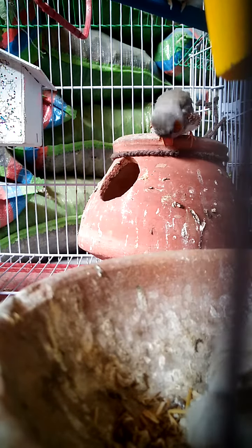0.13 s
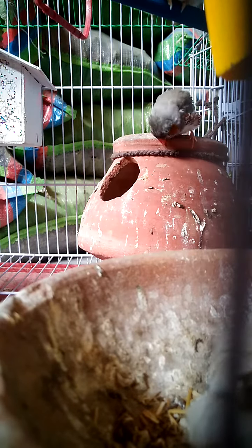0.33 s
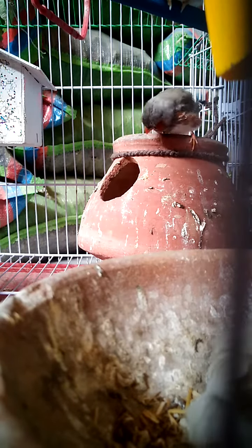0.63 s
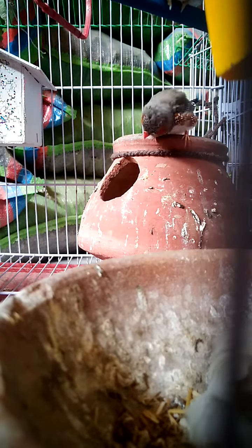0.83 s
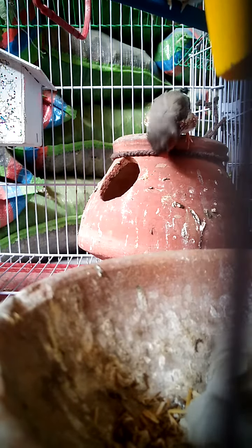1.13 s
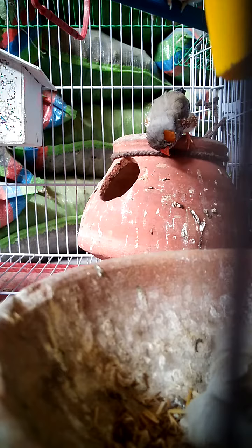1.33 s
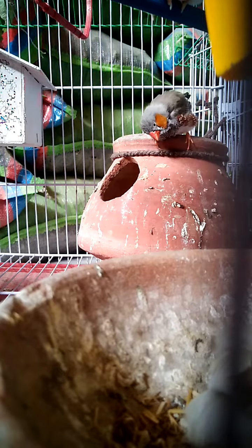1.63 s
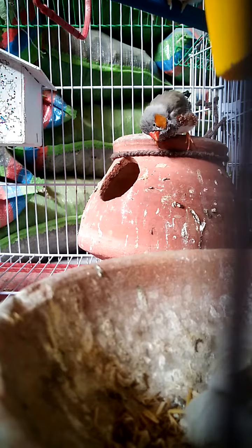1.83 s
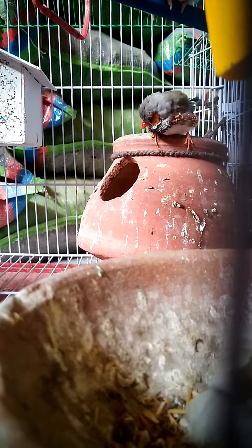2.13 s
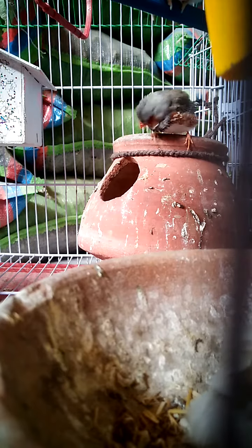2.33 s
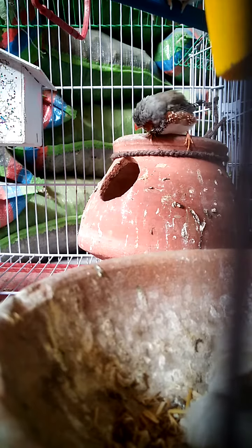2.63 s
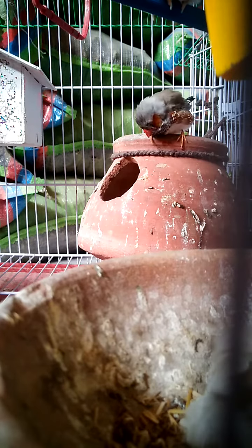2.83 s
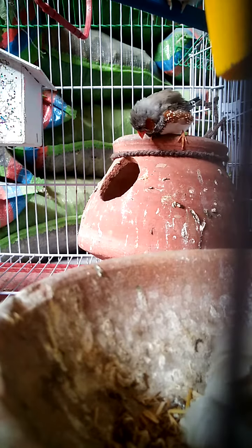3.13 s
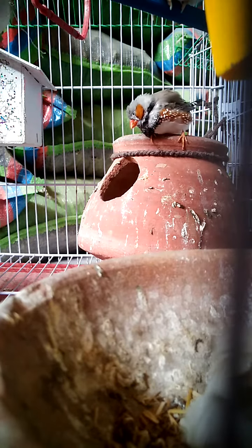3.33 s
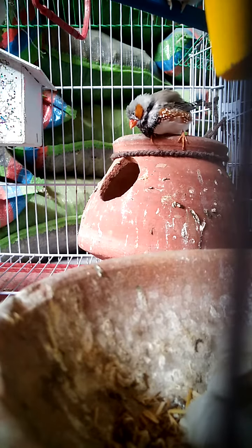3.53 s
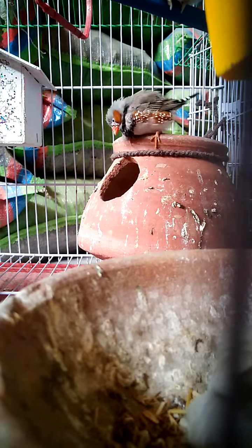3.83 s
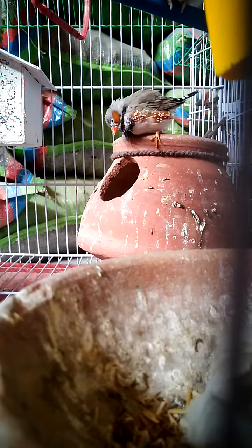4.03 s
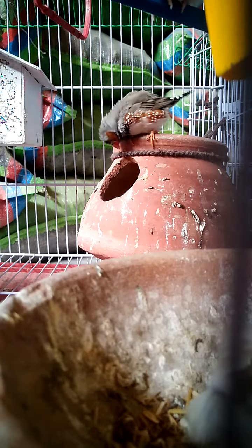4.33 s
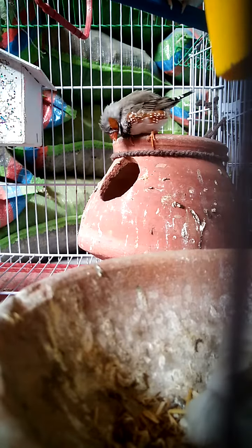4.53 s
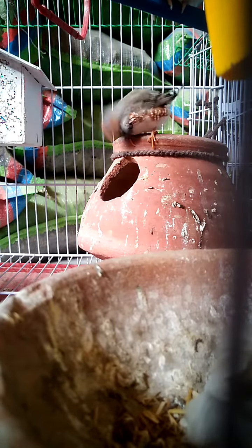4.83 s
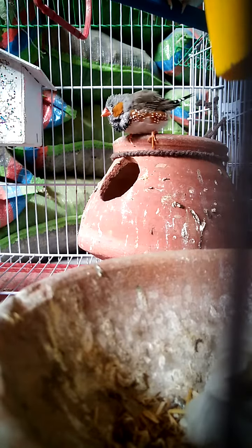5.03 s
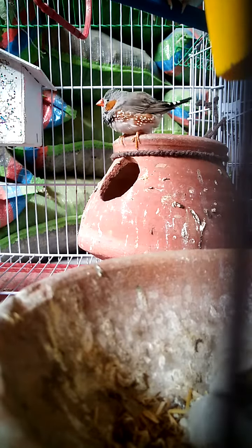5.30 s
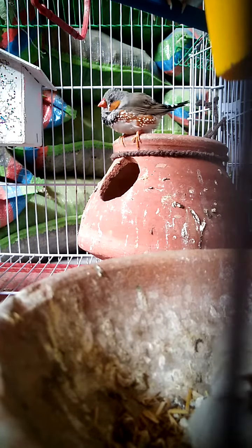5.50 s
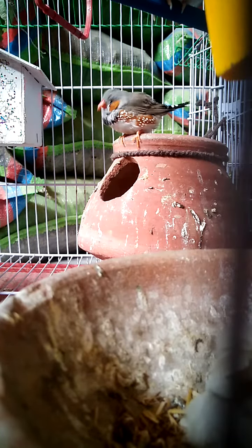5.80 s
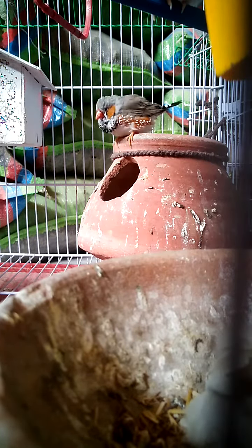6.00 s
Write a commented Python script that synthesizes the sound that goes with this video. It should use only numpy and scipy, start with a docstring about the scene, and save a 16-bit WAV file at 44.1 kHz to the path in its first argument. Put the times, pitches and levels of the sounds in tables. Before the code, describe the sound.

Very short, piercing bird calls with leaping pitch and rough edges stand far above a quiet room. First one, then after soft distant chirps a rapid cluster, then preening rustle and light pot taps, finally another single call and bright clicks. A hard indoor space rings after each call; the near microphone is pushed to its limit, with the bird close and slightly left.

```python
"""Loud, harsh calls of a zebra finch on a clay nest pot in a wire cage: one, a quick run, one more.
Each call is a high whistle-like tone with overtones that leaps in pitch and breaks into roughness.
Between calls: faint farther chirps and tones, hollow knocks from the pot's modes, ticks and feather rustle of
shaped noise. A hard-walled room of decaying noise rings after them; the calls drive the recorder's limiter."""
import sys
import numpy as np
from scipy import signal
from scipy.fft import rfft, irfft, next_fast_len
from scipy.io import wavfile
from scipy.ndimage import uniform_filter1d

SR = 44100
rng = np.random.default_rng(int(sys.argv[2]) if len(sys.argv) > 2 else 0)


def store_wav(level_fs):
    """Save 16-bit WAV to argv[1]."""
    pcm = np.round(np.clip(np.atleast_2d(level_fs), -1, 1) * 32767)
    wavfile.write(sys.argv[1], SR, pcm.T.astype(np.int16))


N = 271656
TIME = np.arange(N) / SR


def from_db(db):
    """Decibels to gain."""
    return 10 ** (np.asarray(db) / 20)


def rms_one(x):
    """Scale to an rms of 1."""
    return x / np.sqrt(np.mean(x ** 2) + 1e-20)


def at_hz(points, hz):
    """Read a table on a log-frequency axis."""
    known_hz, values = np.transpose(points)
    return np.interp(np.log(np.maximum(hz, 1)), np.log(known_hz), values)


def coloured(x, spectrum):
    """Filter a signal by a smooth spectrum of (Hz, dB) points."""
    size = next_fast_len(x.shape[-1] + 1024)
    hz = np.arange(size // 2 + 1) * SR / size
    shaped = rfft(x, size) * from_db(at_hz(spectrum, hz))
    return irfft(shaped, size)[..., :x.shape[-1]]


def coloured_noise(size, spectrum):
    """Noise of a given spectrum with an rms of 1."""
    return rms_one(coloured(rng.standard_normal(size), spectrum))


def decay(t, t60_s):
    """Exponential fall by 60 dB in t60_s."""
    return np.exp(-np.log(1000) * t / t60_s)


def flutter(rate_hz, size):
    """Random wobble up to about the given rate; spread 1."""
    low_pass = signal.butter(2, min(rate_hz, SR / 4), fs=SR, output="sos")
    return rms_one(signal.sosfilt(low_pass, rng.standard_normal(size + SR // 10))[-size:])


def add(track, s, sound):
    """Mix a sound into a track at a time."""
    start = int(s * SR)
    part = sound[..., :max(N - start, 0)]
    track[..., start:start + part.shape[-1]] += part


def syrinx(pitch_hz, level_db, rough, jitter, rasp_db, jitter_hz=600, shimmer=0.78, buzz_hz=480,
           buzz_depth=0.095, air_db=-40, leap_per_s=110, second_ratio=1.21, second_db=-3):
    """One note: a tone with overtones, shaped by the throat; roughness shakes its pitch and strength."""
    # Throat and beak resonances. Each row: frequency in Hz, gain in dB.
    throat = [(1200, -6.5), (2400, -20.5), (3100, -11), (4000, -4), (4950, -15), (6300, 10), (7300, -3.5),
              (8400, -10), (9700, -15), (10400, -15), (11200, -19.5), (12500, -20.5), (15000, -52)]
    size = len(pitch_hz)
    shake, tremble, wander = (flutter(jitter_hz, SR // 4)[:size] for _ in range(3))
    # the second side of the syrinx beats against the first as a fast, uneven buzz
    buzz = np.sin(2 * np.pi * np.cumsum(buzz_hz * (1 + .25 * wander)) / SR)
    shaken_hz = pitch_hz * (1 + rough * (jitter * shake + buzz_depth * buzz))
    phase = 2 * np.pi * np.cumsum(shaken_hz) / SR
    # low notes put the second harmonic on the throat's main resonance, high notes the first
    harmonic = np.arange(1, 9)[:, None]
    harmonic_hz = harmonic * pitch_hz
    weight = from_db(at_hz(throat, harmonic_hz)) * (harmonic_hz < SR / 2)
    tone = (weight * np.sin(harmonic * phase)).sum(0) / np.sqrt((weight ** 2).sum(0) / 2)
    # in rough notes the two sides part and a second, higher tone crosses the first
    second = np.sin(second_ratio * phase) + np.sin(2 * second_ratio * phase)
    tone = tone + from_db(second_db) * rough * second
    # the tone weakens in the steepest sweeps
    leap = np.abs(np.gradient(np.log(pitch_hz))) * SR
    tone = tone / (1 + (leap / leap_per_s) ** 4)
    air = coloured_noise(SR // 4, throat)[:size]
    air_gain = from_db(air_db) + from_db(rasp_db) * rough
    voice = tone * (1 + shimmer * rough * tremble) + air * air_gain
    return voice * from_db(level_db)


def notes(rows, jitter, rasp_db, attack_s, release_s=0.0035):
    """Each note's pitch follows a parabola through three values; its level changes evenly in dB."""
    out = np.zeros(N)
    for s, length_s, start_hz, middle_hz, end_hz, level_db, fade_db, rough in rows:
        t = TIME[:int(length_s * SR)]
        along = t / length_s
        pitch_hz = np.polyval(np.polyfit([0, .5, 1], [start_hz, middle_hz, end_hz], 2), along)
        gate = np.clip(np.minimum(t / attack_s, (length_s - t) / release_s), 0, 1)
        voice = syrinx(pitch_hz, level_db - fade_db * along, rough, jitter, rasp_db)
        add(out, s, np.sin(np.pi / 2 * gate) ** 2 * voice)
    return out


def finch_calls(jitter=.048, rasp_db=-18.0, attack_s=0.0052):
    """The same eight notes each time, varied in level, pitch, pace and roughness; an open beak is hollow."""
    # The call's notes, before the variation below. Each row: start in seconds into the call, length in
    # seconds, start, middle and end pitch in Hz, level in dB, fade over the note in dB, roughness 0-1.
    # In order: faint lead-in, upstroke, leap to the top register, rising whistle, arch, sagging whistle,
    # rough break, closing lift.
    call_notes = [(0.0, .008, 2504, 2600, 2850, -30.5, -7, .15),
                  (.004, .016, 2875, 3170, 3403, -1.5, 7, 0.03),
                  (.017, .017, 3900, 6250, 7144, -4.5, -0.5, .2),
                  (.032, .032, 3890, 4133, 4367, -5, 10.5, .05), (0.066, .024, 2686, 3193, 2800, -1, 4, .1),
                  (0.086, .036, 4076, 3690, 3680, -7.5, -2.5, 0.12),
                  (.121, .012, 3650, 3230, 3596, -7, 0.5, .55), (.127, .019, 3893, 4130, 4264, -5, 7.5, .1)]
    # Each call: start in seconds, level in dB, pitch ratio, time stretch, roughness factor, beak opening 0-1.
    call_times = [(.526, 0, 1.023, 0.94, 1, 0.7), (2.434, -1.5, .995, .985, 1.05, .15),
                  (5.137, -0.5, 1.003, 1.035, 1.5, 0.96)]
    # Timbre of a fully open beak. Each row: frequency in Hz, gain in dB.
    open_beak = [(1800, 2), (2700, -2.5), (3200, -0.5), (4400, 0), (4750, -16), (5200, -14), (5550, -4),
                 (9900, 0), (10400, -12), (10900, 1.5), (13000, -10.5)]
    out = np.zeros(N)
    for s, call_db, ratio, stretch, harshness, opening in call_times:
        rows = [(s + stretch * at, stretch * length, ratio * start, ratio * middle, ratio * end,
                 call_db + db, fade, harshness * rough)
                for at, length, start, middle, end, db, fade, rough in call_notes]
        beak = [(hz, np.clip(opening, 0, 1) * db) for hz, db in open_beak]
        out += coloured(notes(rows, jitter, rasp_db, attack_s), beak)
    return out


def loose_notes():
    """The finch's quick run around the middle call and a rasp ending the last, through a narrow beak."""
    # Each row: start in seconds, length in seconds, start, middle and end pitch in Hz, level in dB,
    # fade over the note in dB, roughness 0-1.
    chatter = [(2.305, 0.012, 7240, 6900, 6500, -16, 0.5, 0.06),
               (2.319, 0.029, 2620, 2438, 3980, -6.5, 14, 0.28),
               (2.343, 0.024, 4100, 4030, 2900, -16.5, 6.5, 0.28),
               (2.361, 0.0085, 5705, 5370, 4800, -3.5, 4, 0.42),
               (2.365, 0.0088, 8160, 7870, 7400, -8, 0, 0.21),
               (2.373, 0.013, 4624, 4810, 5150, -14, -4, 0.22),
               (2.383, .029, 5154, 5730, 6290, -10.5, 0, .14),
               (2.564, 0.035, 3800, 3675, 3380, -11, 12.5, .9),
               (2.778, 0.018, 4400, 4080, 3510, -31.5, -14, 0.6),
               (2.787, .013, 3445, 3414, 3150, -3.5, 4, 0.19),
               (2.794, .031, 2910, 2957, 3210, -6.5, 12, 0.06),
               (2.871, 0.0136, 3600, 3675, 3410, -18.5, -1, 0.3),
               (2.879, 0.042, 3423, 2707, 2816, -6.5, 15.5, 0.32),
               (2.921, 0.01615, 2788, 3104, 3460, -3.5, 3.5, .22),
               (2.932, 0.02, 3400, 3207, 3197, -1, 2, 0.2), (2.95, 0.022, 3250, 3070, 3080, -19, 1, 0.28),
               (5.256, 0.0204, 3402, 3078, 3334, -11, 4.5, 0.47)]
    # Beak timbre. Each row: frequency in Hz, gain in dB.
    narrow_beak = [(2000, 0), (2500, 3), (3300, -4), (4000, -4.5), (4800, 2), (6400, 1), (8000, 3),
                   (10500, 0), (13000, 3)]
    return coloured(notes(chatter, jitter=0.075, rasp_db=-17.5, attack_s=0.006), narrow_beak)


def far_chirps():
    """Soft nasal chirps of farther birds: the same voice with a slower attack and a duller timbre."""
    # Each row: start in seconds, length in seconds, start, middle and end pitch in Hz, level in dB,
    # fade over the note in dB, roughness 0-1.
    chirps = [(1.6, 0.054, 1674, 1708, 1643, -30, 2.5, 0.13),
              (1.665, 0.081, 1587, 1495, 1436, -42.5, -5, 0.6),
              (1.755, 0.0543, 1668, 1760, 1760, -28.5, 1, .2),
              (1.805, .045, 1690, 1340, 1132, -40.5, 14.5, .7),
              (3.815, 0.069, 1732, 1785, 1820, -34.5, -2, 0.3),
              (4.065, .07, 1970, 1886, 1738, -35, -5.5, 0.17),
              (4.125, 0.059, 1674, 1554, 1612, -27, -5, 0.07)]
    # The farther birds' timbre. Each row: frequency in Hz, gain in dB.
    far_colour = [(1500, -22), (2200, 6), (3200, 5), (4200, -7.5), (5200, -1.5), (6300, -9.5), (7300, 1),
                  (10400, -2.5), (12000, -6.5)]
    return coloured(notes(chirps, jitter=.2, rasp_db=-7.5, attack_s=0.018), far_colour)


def pot_knocks(spread_db=2, lowest_hz=300, scuff_db=-6, scuff_t60_s=0.35):
    """Each knock sets the pot's modes ringing and trails off in a scuff; so small a pot radiates no bass."""
    # Each row: start in seconds, level in dB, boom of the air inside in dB relative to the wall.
    knocks = [(.894, -38, -22), (.985, -44.5, -18), (2.371, -44.5, 8), (2.618, -41.5, -27),
              (2.711, -41, -13), (3.525, -41.5, 7), (4.104, -45.5, 11.5), (5.721, -39, 2),
              (5.824, -42.5, 11.5)]
    # The pot's modes, two of its air and then the wall. Each row: frequency in Hz, level in dB, t60 in seconds.
    pot = [(354.3, -4.5, 0.36), (387, -0.5, 0.34), (437, -4, 0.11), (566, -5, .12), (616.4, -1, 0.15),
           (620, -4.5, 0.17), (800, -23, .06)]
    # Feet and beak brushing the clay. Each row: frequency in Hz, gain in dB.
    scuff_colour = [(250, -29.5), (350, -15.5), (420, -9.5), (600, 0), (750, -20.5), (1300, -22.5),
                    (2500, -32)]
    out, t = np.zeros(N), TIME[:SR // 2]
    hz, mode_db, t60_s = np.transpose(pot)[:, :, None]
    is_air = np.arange(len(pot))[:, None] < 2
    for s, level_db, boom_db in knocks:
        strength_db = mode_db + boom_db * is_air + spread_db * rng.standard_normal(hz.shape)
        ring = (from_db(strength_db) * decay(t, t60_s) * np.sin(2 * np.pi * hz * t)).sum(0)
        scuff = coloured_noise(len(t), scuff_colour) * decay(t, scuff_t60_s)
        add(out, s, from_db(level_db) * (.5 * ring + from_db(scuff_db) * scuff))
    return signal.sosfilt(signal.butter(4, lowest_hz, "high", fs=SR, output="sos"), out)


def ticks(tick_t60_s=0.016, clack_t60_s=0.04, tick_db=-7):
    """Beak and claws on clay and wire: a sharp bright noise burst with a duller clack under it."""
    # Each row: start in seconds, level in dB before tick_db, clack in dB relative to the tick.
    contacts = [(1.0027, -39, -22), (1.43, -67.5, -3), (2.0065, -59, -15.5), (2.1715, -57, -8),
                (4.1888, -37, -41), (4.9083, -51, 1), (5.432, -38, -4.5), (5.555, -40, -20),
                (5.685, -38, -10.5), (6.0857, -34, -5.5), (6.0922, -26, -19.5)]
    # Spectra of tick and clack. Each row: frequency in Hz, gain in dB.
    tick_colour = [(1500, -6.5), (3000, -9), (4500, 7.5), (6500, 14.5), (9000, 6.5), (13000, -1),
                   (16000, -29)]
    clack_colour = [(200, -37), (550, -12), (900, -1), (1450, 7.5), (2200, -10.5), (4000, -20.5)]
    out, t = np.zeros(N), TIME[:SR // 10]
    for s, level_db, clack_db in contacts:
        bright = coloured_noise(len(t), tick_colour) * decay(t, tick_t60_s)
        dull = coloured_noise(len(t), clack_colour) * decay(t, clack_t60_s)
        add(out, s, from_db(level_db + tick_db) * (bright + from_db(clack_db) * dull))
    return out


def far_tones(waver=.035, waver_hz=25):
    """Faint hollow tones from far away: wavering sines with an octave, swelling and fading."""
    # Each row: start and end in seconds, start and end pitch in Hz, level in dB, octave in dB re the tone.
    tones = [(0, 0.223, 387.2, 392, -66, 10.5), (0.154, 0.257, 317, 308, -53.5, -20),
             (0.396, .52, 928, 898, -61, -28.5), (1.087, 1.166, 1245, 1220, -52.5, -26),
             (1.11, 1.14, 164, 169, -56, -26), (1.231, 1.339, 499, 451, -63.5, -5),
             (1.574, 1.709, 1027, 1017, -59.5, -3.5), (3.202, 3.279, 553, 519.6, -53, -29),
             (3.955, 4.415, 406.6, 402.3, -61, -3), (4.406, 4.646, 385.3, 349.7, -59.5, -28.5),
             (4.97, 5.038, 184, 174, -62, -43), (5.329, 6.08, 381, 365, -61.5, -4.5)]
    out = np.zeros(N)
    for start_s, end_s, start_hz, end_hz, level_db, octave_db in tones:
        along = np.linspace(0, 1, max(int((end_s - start_s) * SR), 2))
        glide_hz = start_hz + (end_hz - start_hz) * along
        pitch_hz = glide_hz * (1 + waver * flutter(waver_hz, SR)[:len(along)])
        phase = 2 * np.pi * np.cumsum(pitch_hz) / SR
        envelope = np.abs(np.sin(np.pi * along)) ** .5
        tone = np.sin(phase) + from_db(octave_db) * np.sin(2 * phase)
        add(out, start_s, from_db(level_db) * envelope * tone)
    return out


def swell(peak_s, rise_s, fall_s, drop_db=13.5):
    """A bell-shaped gain, drop_db under its peak one rise time before and one fall time after."""
    away = (TIME - peak_s) / np.where(TIME < peak_s, rise_s, fall_s)
    return from_db(-drop_db * np.minimum(away ** 2, 10))


def soft_noise(spectrum, gain, grain_db, grain_hz, shared=0.1):
    """Diffuse stereo noise with an uneven grain."""
    common, own = rng.standard_normal(N), rng.standard_normal((2, N))
    noise = rms_one(coloured(shared * common + own, spectrum))
    return noise * gain * from_db(grain_db * flutter(grain_hz, N))


def background(floor_dull_db=-13, floor_rasp_db=-10.5):
    """Feather rustles and short low rasps swell out of a faint hiss and the hum of the room."""
    # Floor, which sinks for about a second before the run. Each row: time in seconds, hiss in dB, hum in dB.
    floor_levels = [(0, -64.5, -66.5), (0.351, -43.5, -75), (1.25, -49.5, -58.5), (1.52, -71, -71),
                    (2.08, -71, -70.5), (2.299, -57.5, -67.5), (3.3, -48, -70), (3.62, -49, -54.5),
                    (4.1, -52.5, -76), (4.7, -49, -68.5), (5.7, -47.5, -62.5), (6.16, -50, -67)]
    # Each row: peak, rise and fall in seconds, bright rustle in dB, dull hiss in dB.
    rustles = [(.38, .3, 0.21, -42.5, -43), (.985, .05, .05, -37, -48.5), (1.22, 0.26, 0.16, -56, -79),
               (3.44, 0.073, 0.22, -42, -56), (3.8, 0.12, 0.31, -46.5, -47.5), (4.23, 0.15, 0.2, -46, -51),
               (4.884, 0.059, 0.15, -33, -47), (5.64, 0.081, 0.19, -48, -52.5), (6.1, 0.33, .2, -48, -46)]
    # Each row: peak, rise and fall in seconds, level in dB.
    rasps = [(2.26, .17, 0.22, -57.5), (3.47, 0.13, 0.29, -38.5), (4.869, 0.13, 0.35, -52)]
    # Noise spectra. Each row: frequency in Hz, gain in dB.
    rustle_colour = [(2500, -19.5), (4200, -8), (5500, -4), (7000, 3), (8300, -5.5), (10000, -9.5),
                     (13000, -22), (15000, -15)]
    hiss_colour = [(1500, -25.5), (2300, 5.5), (3000, 3.5), (3700, 2.5), (5000, -25.5)]
    rasp_colour = [(600, -26.5), (950, -10), (1150, -6.5), (1400, -0.5), (1800, 2.5), (2100, 1.5),
                   (2500, -13), (3200, -37.5)]
    hum_colour = [(25, -22.5), (60, -5.5), (170, -5.5), (280, 2.5), (520, -4), (750, 7), (1100, -4),
                  (2000, -37)]
    s, *columns = np.transpose(floor_levels)
    floor, hum = (from_db(np.interp(TIME, s, column)) for column in columns)
    bright = floor
    dull = floor * from_db(floor_dull_db)
    rasp = floor * from_db(floor_rasp_db)
    for peak_s, rise_s, fall_s, bright_db, dull_db in rustles:
        shape = swell(peak_s, rise_s, fall_s)
        bright = np.hypot(bright, from_db(bright_db) * shape)
        dull = np.hypot(dull, from_db(dull_db) * shape)
    for peak_s, rise_s, fall_s, level_db in rasps:
        rasp = np.hypot(rasp, from_db(level_db) * swell(peak_s, rise_s, fall_s))
    return (soft_noise(rustle_colour, bright, grain_db=0.8, grain_hz=120)
            + soft_noise(hiss_colour, dull, grain_db=1.3, grain_hz=30)
            + soft_noise(rasp_colour, rasp, grain_db=1.9, grain_hz=60)
            + soft_noise(hum_colour, hum, grain_db=3.5, grain_hz=5.3, shared=0.89))


def room_response(build_s=0.0027, early_db=3, early_s=0.085):
    """Dense echoes that build up quickly and die band by band, the early ones lifted."""
    # Each row: frequency in Hz, t60 in seconds.
    room_t60 = [(300, 1), (2000, 0.99), (4000, 0.73), (6500, 0.66), (9000, 0.49), (14000, 0.95)]
    # Each row: frequency in Hz, gain in dB.
    room_colour = [(300, 5), (2000, 0), (2700, 5.5), (4000, -0.5), (5000, 7.5), (6400, 1.5), (8000, 1),
                   (13000, 0.5)]
    t = TIME[:SR]
    hz, frame_s, cells = signal.stft(rng.standard_normal((2, SR)), SR, nperseg=256)
    dying = cells * decay(frame_s, at_hz(room_t60, hz)[:, None])
    tail = signal.istft(dying, SR)[1][:, :SR]
    tail = tail * (1 - np.exp(-(t / build_s) ** 4)) * from_db(early_db * np.exp(-t / early_s))
    return coloured(tail / np.sqrt((tail ** 2).sum(1, keepdims=True)), room_colour)


def near_echoes(x, skew_s=.0004):
    """Nearby walls repeat the sweeps so that they overlap; each echo reaches the two ports at different times."""
    # First echoes. Each row: mean delay in seconds, level in dB.
    near_walls = [(.0031, -13.5), (.0094, -11), (.0152, -11.5)]
    out = np.zeros((2, N))
    for k, (delay_s, db) in enumerate(near_walls):
        skew = skew_s * (-1) ** k   # the later port alternates
        left = np.interp(TIME - delay_s - skew, TIME, x)
        right = np.interp(TIME - delay_s + skew, TIME, x)
        out += from_db(db) * np.stack([left, right])
    return out


def heard(x, room, direct_db, room_db, left_lag_s=0.00022):
    """The straight path, delayed at the left port by left_lag_s, plus the room."""
    direct = np.stack([np.interp(TIME - left_lag_s, TIME, x), x])
    reverb = signal.fftconvolve(x[None], room, axes=1)[:, :N]
    return from_db(direct_db) * direct + from_db(room_db) * reverb


def scene():
    """The finch nearly straight ahead, farther chirps and small contacts share one room."""
    # The finch shifts about on the rim. Each row: time in seconds, delay at the left port in seconds.
    finch_side = [(.6, -.00001), (2.4, -0.00068), (2.52, .00002), (2.85, .000045), (5.2, .00002)]
    # Right port against left. Each row: frequency in Hz, gain in dB.
    right_ear = [(300, -6), (1500, -4.5), (3000, -4.5), (4000, -5), (6300, -5), (8000, -14), (12000, -14.5)]
    room = room_response()
    finch = finch_calls() + loose_notes()
    finch_lag_s = np.interp(TIME, *np.transpose(finch_side))
    left, right = (heard(finch, room, direct_db=4, room_db=-2, left_lag_s=finch_lag_s)
                   + near_echoes(finch)
                   + heard(far_chirps(), room, direct_db=-9.5, room_db=-9.0)
                   + heard(pot_knocks(), room, direct_db=4.5, room_db=-11.0)
                   + heard(ticks(), room, direct_db=18.0, room_db=8.0, left_lag_s=0)
                   + heard(far_tones(), room, direct_db=2.5, room_db=-1.0)
                   + background())
    return np.stack([left, coloured(right, right_ear)])


def record(dry, ceiling=1.0, release_db_per_s=900, lopsided=0.054, cutoff_hz=14000):
    """A fast limiter holds the peaks; slightly lopsided overload adds a low rumble under loud calls; the top is cut."""
    over_db = np.maximum(20 * np.log10(np.abs(dry) / ceiling + 1e-9), 0)
    release_db = release_db_per_s * TIME
    held_db = np.maximum.accumulate(over_db + release_db, axis=1) - release_db
    limited = np.clip(dry * from_db(-uniform_filter1d(held_db, size=44)), -1, 1)
    no_offset = signal.butter(2, 75, "high", fs=SR, output="sos")
    bent = limited + lopsided * signal.sosfilt(no_offset, limited ** 2)
    return signal.sosfilt(signal.ellip(8, .1, 70, cutoff_hz, fs=SR, output="sos"), bent)


dry = scene()
out = record(dry)
store_wav(out)
```